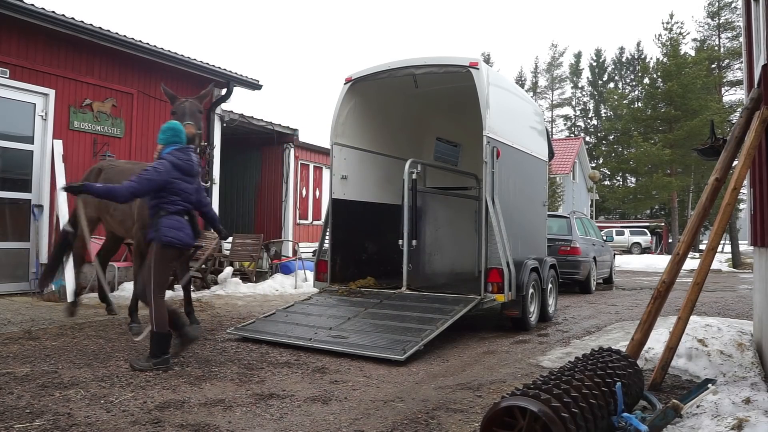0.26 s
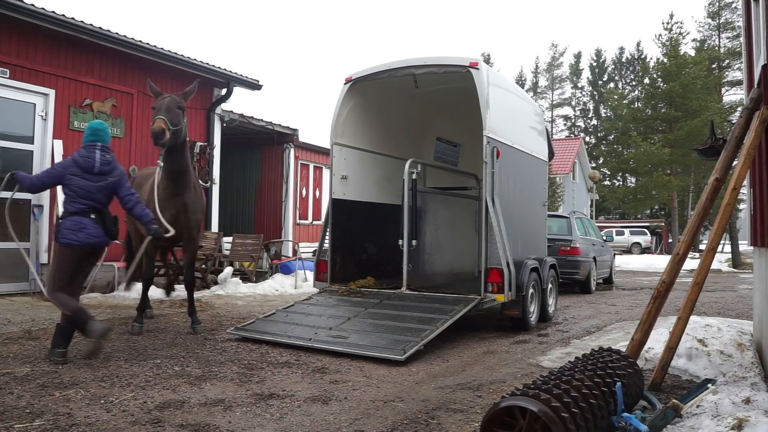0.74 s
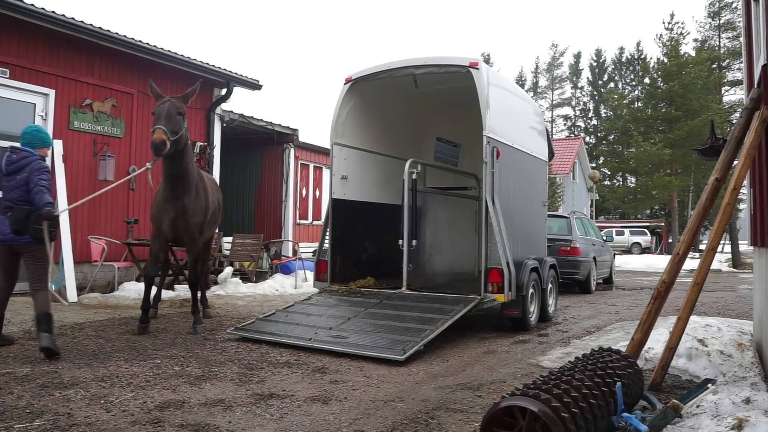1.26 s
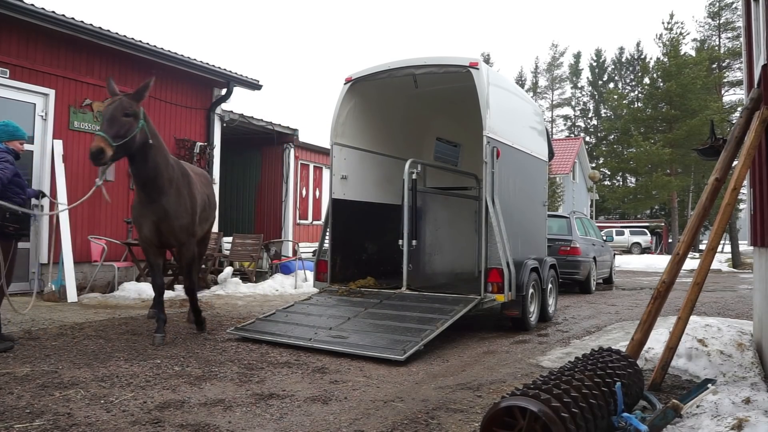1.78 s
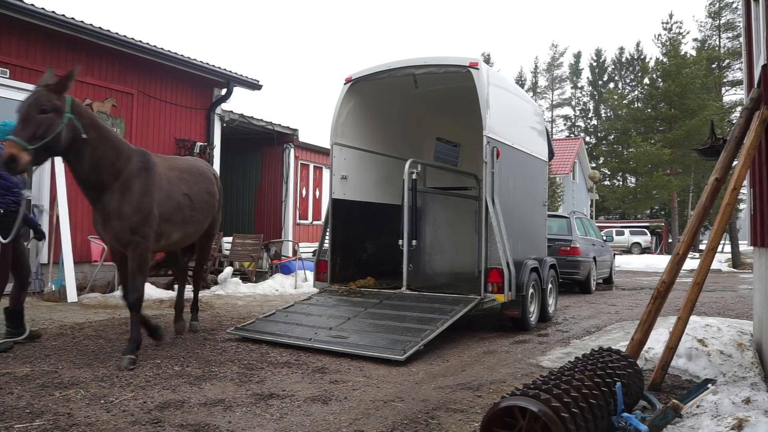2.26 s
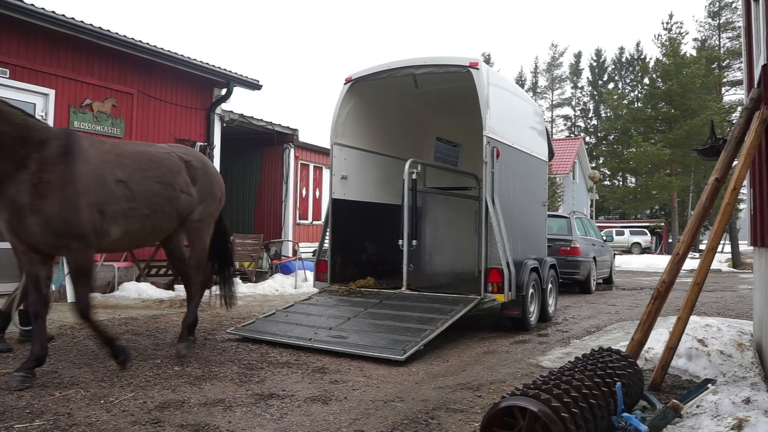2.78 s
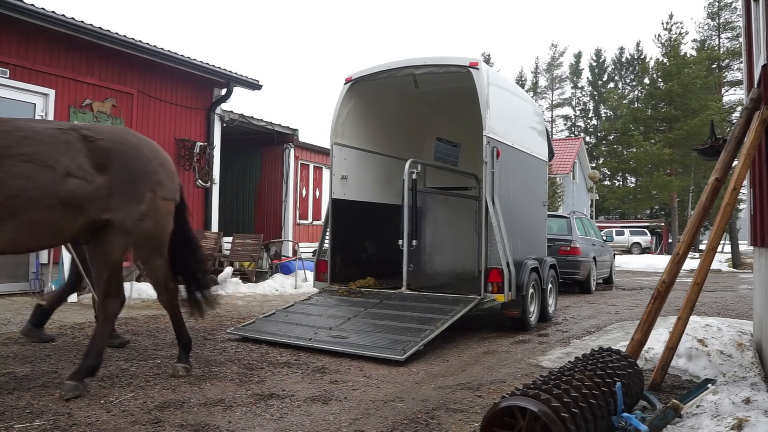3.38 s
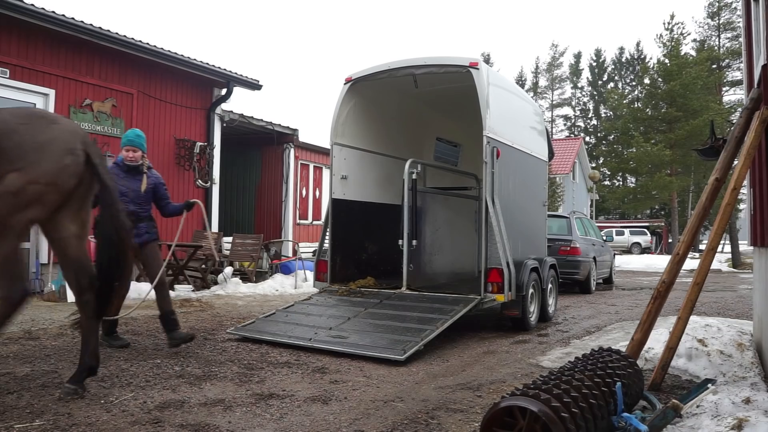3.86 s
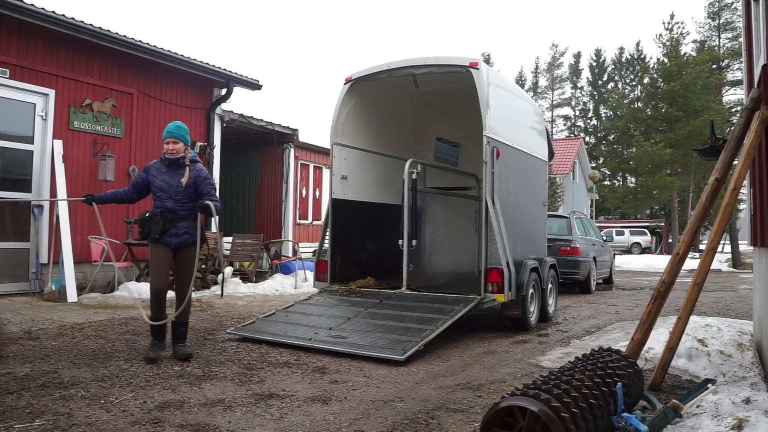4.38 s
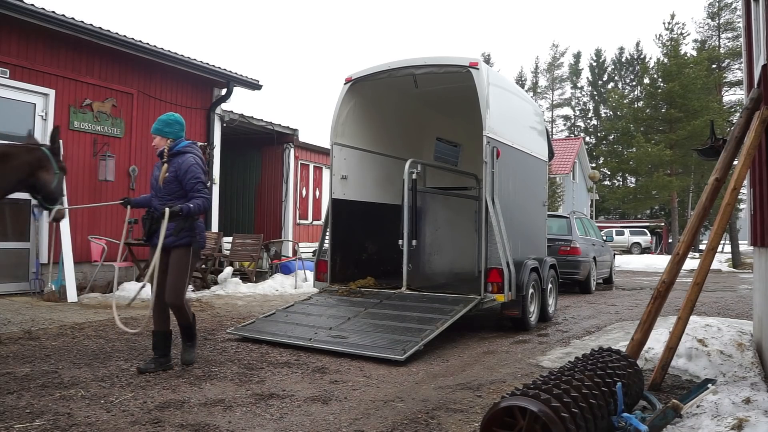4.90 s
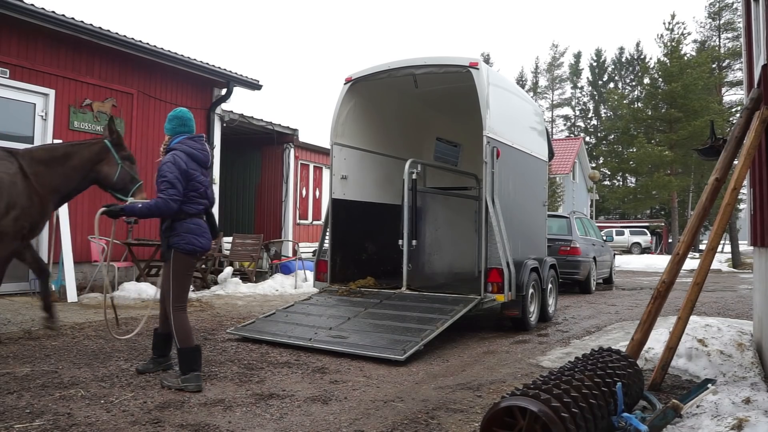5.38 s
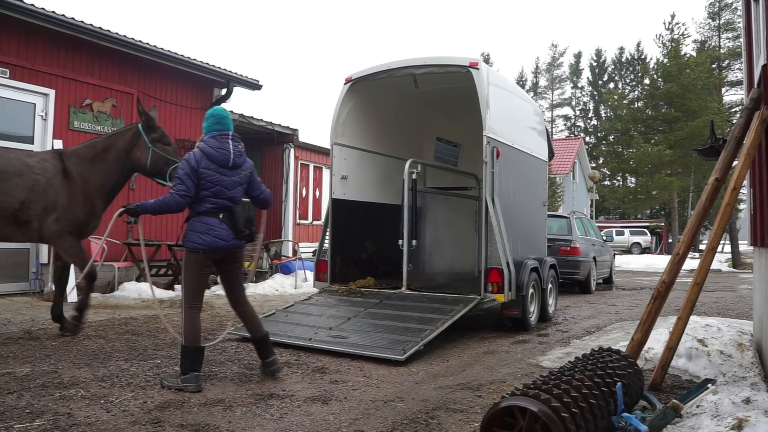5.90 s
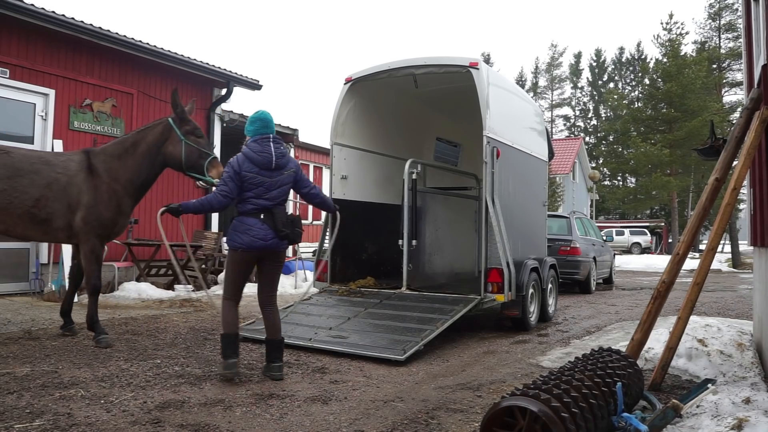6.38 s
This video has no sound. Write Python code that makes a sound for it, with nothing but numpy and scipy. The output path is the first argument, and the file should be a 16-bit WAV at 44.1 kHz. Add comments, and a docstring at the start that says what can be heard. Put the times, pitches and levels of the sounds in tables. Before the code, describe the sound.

Irregular hoof and boot steps crunch on damp, muddy gravel outdoors. A dense opening of knocks, scrapes and dull thumps includes a sharp stone crunch and thin pebble squeaks. Breeze rumbles at the microphone for the first second or so, then fades. Sparser, quieter steps follow over a faint yard hush, heard from a few metres, leaning left, with brief outdoor reflections.

```python
"""A yard of wet gravel: a mule is led round it, a few metres away and louder on the left; boots step along.
Each step crushes stones into a burst of tiny clicks, coloured band by band; scuffs swell and fade the same way.
Hooves knock in short hollow modes, thump the ground and now and then make a pebble squeal in a narrow band.
Barn walls answer briefly as decaying noise, and a light breeze buffets the microphone at first."""
import sys
import numpy as np
from scipy import signal
from scipy.io import wavfile

SR = 44100
rng = np.random.default_rng(int(sys.argv[2]) if len(sys.argv) > 2 else 0)


def wav_out(sig):
    """Save sig, one row per channel (or a flat mono array), as 16-bit PCM at SR to the path in sys.argv[1]."""
    wavfile.write(sys.argv[1], SR, np.round(np.clip(np.atleast_2d(sig).T, -1, 1) * 32767).astype(np.int16))


N = 293265
TIME = np.arange(N) / SR


def from_db(db):
    """Decibels become an amplitude factor."""
    return 10 ** (np.asarray(db) / 20)


def rms_one(x):
    """Scales a signal to an rms of 1."""
    return x / np.sqrt(np.mean(x ** 2) + 1e-20)


def at_hz(points, hz):
    """Reads a curve at a frequency, with straight lines over log frequency."""
    points_hz, values = np.array(points).T
    return np.interp(np.log(hz), np.log(points_hz), values)


def band(x, low_hz, high_hz):
    """Keeps one frequency band."""
    edges = [low_hz, min(high_hz, SR / 2 - 1)]
    return signal.sosfilt(signal.butter(2, edges, "band", fs=SR, output="sos"), x + 1e-18)


def flicker(rate):
    """A random wander of rms 1 that heads for a new value so many times a second."""
    knots = rng.standard_normal(4096)
    return rms_one(np.interp(TIME * rate, np.arange(len(knots)), knots))


def swell(s, rise, fall, roundness=0.98):
    """An envelope builds up to a peak of 1 and dies away; roundness 1 is pointed, 2 is a bell."""
    since = TIME - s
    near = (since > -8 * rise) & (since < 8 * fall)
    out = np.zeros(N)
    out[near] = np.exp(-np.maximum(-since[near] / rise, since[near] / fall) ** roundness)
    return out


def add(out, s, sound):
    """Mixes a short sound in at the given time."""
    start = max(round(s * SR), 0)
    out[start:start + len(sound)] += sound[:N - start]


def ring(hz, t60):
    """A struck mode: a dying sine, a quarter of a second long."""
    t = TIME[:SR // 4]
    return np.sin(2 * np.pi * hz * t) * from_db(-60 * t / t60)


def clicks(per_s, spread_db):
    """Three unrelated trains of contacts: a few much louder than most, or quieter if the spread is negative."""
    born = rng.random((3, N)) < per_s / SR
    count = born.sum()
    sizes_db = spread_db * np.minimum(rng.exponential(1, count), 4)
    out = np.zeros((3, N))
    out[born] = from_db(sizes_db) * rng.choice([-1, 1], count)
    return out


# How the source leans across the microphone pair. Each row: frequency in Hz, left minus right level in dB.
BALANCE = [(60, 2.7), (200, 4.1), (400, 5.3), (1300, 5.3), (2400, 4.3), (4400, 1.6), (5600, 0.84),
           (7000, 13.7), (8200, 2.9), (9500, 0.5), (15000, 1.5)]
LEFT_LAG_S = .00027  # the left channel comes this much later


def place(left, right, hz):
    """The source is louder in the left channel, and the two channels are a fraction of a millisecond apart."""
    half_db = at_hz(BALANCE, hz) / 2
    gains = from_db(half_db * np.array([[1], [-1]]))
    return rms_one(gains) * np.array([np.roll(left, round(LEFT_LAG_S * SR)), right])


# How alike the two microphones hear it. Each row: frequency in Hz, common share of power (clipped to 0..1 in use).
LIKENESS = [(60, 1.26), (300, 0.7), (900, 0.77), (2000, 0.21), (5000, -0.38), (8000, -0.34), (15000, -3)]


def coloured(drives, spectrum, patchy_db, patchy_rate, count):
    """Bands flare independently; part is common to both microphones, part differs. Stereo, rms 1."""
    out = 0
    edges = np.geomspace(spectrum[0][0], spectrum[-1][0], count + 1)
    for k, (low, high) in enumerate(zip(edges, edges[1:])):
        hz = np.sqrt(low * high)
        alike = np.clip(at_hz(LIKENESS, hz), 0, 1)
        drive = drives[k % 2]  # neighbouring bands use different trains
        pair = band(np.sqrt(alike) * drive[0] + np.sqrt(1 - alike) * drive[1:], low, high)
        level_db = at_hz(spectrum, hz) + patchy_db * flicker(patchy_rate)
        out = out + place(*pair, hz) * from_db(level_db)
    return rms_one(out)


def grains(spectrum, per_s, spread_db, patchy_db, count):
    """A steady stream of contacts with the given colour."""
    drives = [clicks(per_s, spread_db), clicks(per_s, spread_db)]
    return coloured(drives, spectrum, patchy_db, 60, count)


# Rumble of the breeze at the microphone. Each row: time in seconds, right-hand level in dB.
BREEZE = [(0, -43), (.18, -46), (.3, -37.5), (1.0, -38), (1.25, -44), (1.45, -63), (1.7, -51), (2.2, -58.5),
          (6.65, -63.5)]
# Colour of the rumble. Each row: frequency in Hz, relative level in dB per Hz.
WIND = [(40, -16), (50, 2), (62, 5.5), (80, 6.5), (120, -2.5), (170, -15.5), (300, -31.5)]
# Puffs on the right microphone port. Each row: start in seconds, level in dB ahead of the band filter.
PUFFS = [(0.349, -17), (0.745, -17.5), (1.191, -22), (1.215, -21), (1.286, -18), (2.741, -23.5)]


def wind():
    """Each port has its own noise rumble; single eddies hit the right one as short low rings."""
    ports = [coloured(rng.standard_normal((2, 3, N)), WIND, 2.7, 12, count=6)[0] for port in range(2)]
    left_right_db = np.array([[-3], [0]])
    rumble = rms_one(np.array(ports)) * from_db(np.interp(TIME, *np.transpose(BREEZE)) + left_right_db)
    puffs = np.zeros(N)
    for (s, level_db), detune in zip(PUFFS, rng.standard_normal(len(PUFFS))):
        add(puffs, s, from_db(level_db) * ring(78 * np.exp(0.071 * detune), 0.083))
    return rumble + band(puffs, 60, 190) * [[0], [1]]


# Colour of the quiet yard. Each row: frequency in Hz, relative level in dB per Hz.
YARD = [(38, -31), (50, 4.5), (70, 1), (120, 2), (200, -6), (340, -4), (580, -6.5), (800, -4.5),
        (1800, -18.5), (5200, -36), (6600, -24.5), (7700, -26.5), (9500, -38), (15500, -34.5)]
YARD_DB = -48.5


def yard_hush():
    """The steady background of the yard is noise whose bands waver slightly."""
    noise = rng.standard_normal((2, 3, N))
    return from_db(YARD_DB) * coloured(noise, YARD, 2.6, 16, count=22)


ATTACK_S, HOLD_SHARE = 0.0021, 0.3  # load time constant; hold as a share of the settling time
BRUSH_DB, BRUSH_S = -10, 0.0056  # the toe's brush: level re the footfall, time constant


def tread(s, settling):
    """The toe brushes the ground; then the load comes on towards 1, holds and dies away."""
    since = np.clip(TIME - s, 0, 1)
    onset = 1 - np.exp(-since / ATTACK_S)
    load = onset * np.exp(-np.maximum(since / settling - HOLD_SHARE, 0))
    return np.maximum(load, from_db(BRUSH_DB) * swell(s, BRUSH_S, BRUSH_S))


# A sole rolls off or drags through the gravel; levels are those ahead of the gravel mix.
# Each row: peak in seconds, fading time in seconds, stones in dB, fine grit in dB re stones.
SCUFFS = [(.005, 0.058, -36.5, 0), (0.219, 0.039, -37, -7.5), (0.494, 0.031, -28.5, -3.5),
          (0.789, 0.12, -36.5, -3.5), (0.933, 0.013, -35.5, -1.5), (.995, 0.043, -35, -10.5),
          (1.062, 0.01, -27, 3), (1.145, 0.034, -37, -1), (1.512, 0.021, -34.5, -19),
          (1.61, 0.017, -31.5, -13), (1.67, 0.021, -36.5, -7), (1.822, 0.019, -36.5, -1.5),
          (1.898, 0.017, -34.5, -3), (2.113, 0.036, -44, -2.5), (2.154, 0.011, -30, -7.5),
          (2.318, 0.036, -25.5, -10), (2.381, 0.0096, -25, 1), (2.559, 0.021, -48.5, 11.5),
          (2.649, 0.037, -42.5, 8), (2.722, 0.026, -45, 4), (3.2, 0.041, -46.5, -13),
          (3.322, 0.071, -41.5, -5.5), (3.89, 0.038, -43, 1), (4.0, 0.098, -49, -4.5),
          (4.61, 0.073, -55, -11), (4.793, 0.011, -40.5, -0.5), (5.118, 0.027, -39.5, -18),
          (5.181, 0.035, -44.5, -7.5), (5.395, 0.021, -40.5, 5), (5.578, 0.039, -49.5, -3.5),
          (5.706, 0.023, -46.5, 0.5), (6.266, 0.025, -49, -2.5), (6.385, 0.021, -52.5, 7),
          (6.447, 0.025, -39, -0.5), (6.588, 0.017, -56.5, 16.5)]
SCUFF_RISE_SHARE, SCUFF_ROUNDNESS = 0.81, 1.27  # swelling time re fading time; shape
# the sole's hollow rub in a typical scuff; its stones; share of the stones' dB swing that the sole follows
SCUFF_SOLE_DB, SCUFF_TYPICAL_DB, SOLE_FOLLOWS = -35.5, -33.5, 0.5
# A hoof or boot is set down on the stones; levels are those ahead of the gravel mix. Each row: start in
# seconds, settling time in seconds, stones in dB, fine grit in dB re stones, hollow sole in dB re stones.
FOOTFALLS = [(0.057, 0.019, -28, -7.5, 2.5), (0.091, 0.013, -34, -5, 3.5), (0.287, 0.02, -36, -14, 8.5),
             (0.372, 0.023, -36.5, -11, 8.5), (0.47, 0.054, -33, -16, -2), (0.511, 0.013, -25, -5, 2.5),
             (.559, 0.028, -24, -7.5, -9), (0.623, 0.0063, -39.5, 1, 15), (0.863, 0.051, -31.5, -1, 2.5),
             (1.027, 0.047, -31.5, -1.5, 2.5), (1.112, 0.0057, -41.5, 12, -1),
             (1.395, 0.0089, -44, -8, 10.5), (1.476, 0.061, -38.5, 3.5, -19), (1.55, 0.018, -28, 1.5, 4.5),
             (1.636, 0.0067, -16.5, -9.5, -8), (1.774, 0.015, -27, -0.5, -2),
             (2.002, 0.022, -45.5, -17, 12), (2.052, 0.015, -38, 6, 9), (2.279, 0.015, -32, 6.5, -9),
             (2.802, 0.028, -37, 3.5, 5.5), (2.84, 0.023, -27, -13, -3.5), (3.072, 0.028, -42.5, -4.5, 4),
             (3.619, 0.041, -35.5, -1, -3), (3.897, 0.035, -43, -1, 4.5), (4.243, 0.022, -42.5, 5, 10),
             (4.293, 0.039, -33, -9.5, -6), (4.349, .04, -49.5, -15, 13.5), (4.425, 0.031, -29.5, -3, -3.5),
             (4.775, 0.021, -39, 2, 2), (4.931, 0.021, -45.5, -3.5, 0.5), (5.002, 0.0088, -47.5, -0.5, -6),
             (5.078, 0.038, -43, 4, 5), (5.38, 0.016, -40.5, 1, 11), (6.003, 0.018, -40.5, 6.5, 4),
             (6.104, 0.027, -41, 0.5, 0), (6.316, 0.017, -40.5, -30, 7.5)]


def pressing():
    """Footfalls work stones, grit and sole at once, scuffs gradually; the bed gives way in small jerks."""
    power = np.zeros((3, N))
    for s, settling, stones_db, grit_db, sole_db in FOOTFALLS:
        levels = from_db([stones_db, stones_db + grit_db, stones_db + sole_db])
        power += np.outer(levels, tread(s, settling)) ** 2
    for s, fading, stones_db, grit_db in SCUFFS:
        sole_db = SCUFF_SOLE_DB + SOLE_FOLLOWS * (stones_db - SCUFF_TYPICAL_DB)
        levels = from_db([stones_db, stones_db + grit_db, sole_db])
        drag = swell(s, SCUFF_RISE_SHARE * fading, fading, SCUFF_ROUNDNESS)
        power += np.outer(levels, drag) ** 2
    jerks = from_db(1.43 * flicker(260))
    return np.sqrt(power) * jerks


def pebbles(force, per_s=12, t60=0.15, count=36):
    """Single stones snap against each other and ring briefly, each at a pitch of its own."""
    out = np.zeros((2, N))
    for hz in np.geomspace(2000, 9000, count) * np.exp(0.0244 * rng.standard_normal(count)):
        hits = clicks(per_s, 3.7)[0] * force
        mode = ring(hz, t60)[:SR // 20]
        mode[1] += 3  # the dry tick of first contact
        mode = mode * np.sqrt(SR / (per_s * count * np.sum(mode ** 2)))
        sound = signal.oaconvolve(hits, mode)[:N]
        out += place(sound, sound * rng.choice([-1, 1]), hz)
    return out


# Colours of coarse stones, of ordinary stones, of fine grit and of the hollow sole.
# Each row: frequency in Hz, relative level in dB per Hz.
COARSE = [(900, 6), (1400, -4.5), (1900, -3), (2700, 2), (3400, -3), (4600, -8.5)]
STONES = [(1800, -32), (2800, -4), (3700, -0.5), (4500, -1), (5300, 0.5), (6300, -8), (8000, -22)]
GRIT = [(4500, -7), (6000, -5.5), (6800, -3), (7700, 6), (8700, -5), (9600, -11.5), (12000, -19),
        (15500, -16)]
HOLLOW = [(150, -16.5), (340, -3), (480, 0), (610, -12.5), (760, 5.5), (950, -3), (1170, 2), (1450, -6),
          (2000, -13.5)]


def gravel(stones, grit, hollow, sorting=0.33):
    """Each press sets stones and grit crackling; where there is little grit the coarse, lower stones gain."""
    fineness = np.clip((grit + 1e-6) / (stones + 1e-6), .1, 3) ** sorting
    coarse_stones = stones / fineness * grains(COARSE, per_s=1500, spread_db=4.0, patchy_db=3.0, count=10)
    plain_stones = stones * fineness * grains(STONES, per_s=1700, spread_db=1.5, patchy_db=5.0, count=12)
    fine_grit = grit * grains(GRIT, per_s=1800, spread_db=3.5, patchy_db=3.0, count=20)
    sole = hollow * grains(HOLLOW, per_s=1100, spread_db=3.0, patchy_db=3, count=14)
    return (from_db(-5.5) * coarse_stones + from_db(-1.5) * plain_stones + from_db(1.33) * fine_grit
            + from_db(-2.5) * sole + from_db(-14) * pebbles(stones))


SETTLING_DB = -64.5


def settling_stones():
    """Loose stones tick sparsely throughout, at a level that wanders slightly."""
    level = from_db(SETTLING_DB + 0.84 * flicker(7.6))
    return level * grains(STONES, per_s=220, spread_db=3.5, patchy_db=9.5, count=8)


ECHO_DB, YARD_T60_S = -11, 0.17


def walls(x):
    """Scattered echoes from barn and trailer, different for each side, with little bass or top."""
    t = TIME[:SR // 2]
    tail = rng.standard_normal((2, len(t))) * from_db(-60 * t / YARD_T60_S)
    tail = band(tail * np.clip(t / 0.01, 0, 1), 150, 8000)
    tail *= np.sqrt(1 / np.sum(tail ** 2))
    return signal.fftconvolve(x, tail, axes=1)[:, :N]


# Thin, high fizzes of wet grit under a sole; the one at 4.161 s is a lone stone tick.
# Each row: start in seconds, level in dB.
FIZZES = [(.513, -37), (1.03, -41), (1.052, -34), (2.282, -34.5), (3.62, -40), (4.161, -55), (4.432, -44),
          (5.38, -50), (6.002, -49), (6.108, -41)]
# Colours of the fizz and of a cracking stone. Each row: frequency in Hz, relative level in dB per Hz.
FIZZ = [(11000, -8), (12500, 13), (14000, 3.5), (16000, 0)]
CRACK = [(350, -13), (900, 23), (1800, 18), (3500, 8), (5500, -6.5), (9500, -11)]
CRACK_DB = -6.5  # the first stone under the sole: level re the footfall's stones


def cracks_and_fizzes():
    """A cracking stone gives a burst of a few milliseconds; dense high grains give a thin, short fizz."""
    crack = sum(from_db(stones_db + CRACK_DB) * swell(s + 0.0027, 0.00015, 0.001)
                for s, _, stones_db, *_ in FOOTFALLS)
    fizz = sum(from_db(level_db) * swell(s + 0.00176, 0.0014, .018) for s, level_db in FIZZES)
    return (crack * grains(CRACK, per_s=9500, spread_db=-2.5, patchy_db=-3, count=8)
            + fizz * grains(FIZZ, per_s=6000, spread_db=7.0, patchy_db=5.0, count=3))


# Full weight lands on soft ground. Each row: start in seconds, thump in dB ahead of its band filter,
# thump pitch in Hz before a small random detuning, mud slap in dB.
LANDINGS = [(0.091, -25, 86, -32.5), (.289, -26, 135, -27.5), (0.374, -27, 112, -29.5),
            (.468, -28, 90, -29), (.516, -22, 85, -33), (.865, -23.5, 119, -36), (1.053, -43, 105, -38),
            (1.149, -33, 97, -33), (1.558, -33, 101, -51), (1.637, -27.5, 91, -26.5),
            (2.057, -26, 93, -27.5), (2.809, -21.5, 112, -49), (3.075, -41, 111, -36.5),
            (3.904, -30, 137, -37.5), (4.245, -36, 120, -43), (4.357, -36, 101, -39),
            (4.427, -32.5, 99, -40), (5.096, -32.5, 92.5, -50), (5.384, -43, 110, -40.5),
            (6.441, -41, 115, -39)]
# Colour of the wet earth. Each row: frequency in Hz, relative level in dB per Hz.
MUD = [(110, -3), (210, -0.5), (320, 0.5), (480, 0.5), (700, -9), (1200, -20.5)]
THUMP_T60_S, SLAP_S = 0.093, 0.012


def landings():
    """The ground gives a low dying thump and wet earth slaps under each heavy step."""
    thump, slap = np.zeros(N), np.zeros(N)
    for (s, thump_db, hz, slap_db), detune in zip(LANDINGS, rng.standard_normal(len(LANDINGS))):
        add(thump, s, from_db(thump_db) * ring(hz * np.exp(0.052 * detune), THUMP_T60_S))
        slap += from_db(slap_db) * swell(s + 0.0028, 0.0016, SLAP_S)
    thump = band(thump, 71, 170)
    return place(thump, thump, 100) + slap * grains(MUD, per_s=2000, spread_db=3.5, patchy_db=1.5, count=9)


# Hoof wall striking a stone. Each row: moment of the stop in seconds, level in dB, pitch in Hz.
KNOCKS = [(.181, -28, 970), (0.211, -18, 1040), (.292, -21, 864), (.333, -34, 1004), (.377, -22, 1420),
          (.46, -20.5, 855), (.472, -17.5, 854), (.489, -21, 870), (.563, -18.5, 1020), (.575, -14, 812),
          (.595, -23, 1000), (.627, -23.5, 778), (0.866, -24, 1124), (.945, -23.5, 1334), (1.561, -17, 817),
          (1.587, -24.5, 1150), (1.611, -20, 804), (1.82, -24, 1166), (2.003, -30.5, 1150),
          (2.061, -33, 1090), (2.253, -21, 1110), (2.331, -23, 1082), (2.848, -25, 793), (4.302, -26, 1003),
          (4.35, -31, 964), (5.111, -26, 1080), (5.383, -41, 1050), (6.316, -32, 1096)]
# What a hoof rings with, before small random changes of level and pitch.
# Each row: multiple of the knock's pitch, level in dB re the knock, 60 dB decay time in seconds.
HOOF_MODES = [(.45, -24, 0.022), (.8, -34.5, 0.052), (1.001, 2, 0.027), (1.24, -3.5, 0.013),
              (1.65, -15.5, 0.026), (2.9, -30, 0.0063), (4.3, -24, 0.011)]
# a harder knock slips for longer before it stops: typical slip, typical knock, share of its dB followed
KNOCK_BUILD_UP_S, KNOCK_TYPICAL_DB, BUILD_UP_FOLLOWS = .0013, -22, 0.57
# the hoof wall grinds on the stone around each knock: level re the knock, time constants
GRIND_DB, GRIND_RISE_S, GRIND_FALL_S = -17.5, .004, 0.031


def knocks(hollow):
    """The hoof rings in a few short modes: slipping pumps them up, the stop lets them die, stones rub them."""
    out = np.zeros(N)
    grinding = sum(from_db(level_db + GRIND_DB) * swell(s, GRIND_RISE_S, GRIND_FALL_S)
                   for s, level_db, _ in KNOCKS)
    rubbing = np.hypot(from_db(-8) * hollow, grinding) * rms_one(clicks(1500, 3.8)[0])
    nearest = abs(TIME - np.array(KNOCKS)[:, :1]).argmin(axis=0)
    t = TIME[:SR // 5] - .03  # zero at the stop
    chances = rng.standard_normal((len(KNOCKS), 2, len(HOOF_MODES)))
    for k, ((s, level_db, hz), chance) in enumerate(zip(KNOCKS, chances)):
        hoof = 0
        build_up = KNOCK_BUILD_UP_S * from_db(BUILD_UP_FOLLOWS * (level_db - KNOCK_TYPICAL_DB))
        for (multiple, mode_db, t60), loud, detune in zip(HOOF_MODES, *chance):
            envelope = np.exp(np.minimum(t / build_up, -np.log(1000) * t / t60))
            level = from_db(mode_db + 1.9 * loud) * np.sign(loud)
            mode_hz = hz * multiple * (1 + 0.026 * detune)
            hoof = hoof + level * envelope * np.sin(2 * np.pi * mode_hz * t)
        add(out, s + t[0], from_db(level_db) * hoof)
        # rubbing excites the modes of the knock nearest in time
        answer = hoof[t > 0] / np.linalg.norm(hoof[t > 0])
        here = nearest == k
        add(out, TIME[here][0], signal.fftconvolve(rubbing[here], answer))
    return place(out, out, 1000)


# Pebbles skidding on each other. Each row: peak in seconds, level in dB, pitch in Hz.
SKIDS = [(1.035, -27, 8650), (1.058, -18.5, 8460), (1.056, -17, 5100), (1.059, -19, 4600),
         (2.287, -17.5, 7770), (2.65, -19.5, 7200), (4.441, -28.5, 5100), (4.788, -36, 4870),
         (6.393, -36, 7700), (6.591, -39, 6950)]
SKID_RISE_S, SKID_FALL_S, SKID_ROUNDNESS = 0.0076, 0.011, 1.3  # every skid swells and fades alike


def skids(width=0.1):
    """A pebble slips in a rapid chatter that rings in one narrow band; width is a share of its pitch."""
    out, chatter = np.zeros((2, N)), clicks(3500, 0.95)
    mixed = 0.15 * chatter[0] + chatter[1:]  # a little common to both channels
    for s, level_db, hz in SKIDS:
        squeal = rms_one(band(mixed, hz * (1 - width / 2), hz * (1 + width / 2)))
        envelope = swell(s, SKID_RISE_S, SKID_FALL_S, SKID_ROUNDNESS)
        out += from_db(level_db) * envelope * place(*squeal, hz)
    return out


def scene():
    """Footfalls, loose stones ticking, their echoes, the hush of the yard and the breeze."""
    stones, grit, hollow = pressing()
    feet = gravel(stones, grit, hollow) + settling_stones() + cracks_and_fizzes()
    feet = feet + landings() + knocks(hollow) + skids()
    return feet + from_db(ECHO_DB) * walls(feet) + yard_hush() + wind()


CUTOFF_HZ = 16000


def record(dry, dip_hz=10700, dip_width_hz=2600, low_cut_hz=44):
    """A band in the high treble is dull; deep bass and the top are cut."""
    dull = signal.lfilter(*signal.iirnotch(dip_hz, dip_hz / dip_width_hz, fs=SR), dry)
    mixed = 0.87 * dull + 0.14 * dry  # part of the dry sound keeps the dip from being total
    lean = signal.sosfilt(signal.butter(3, low_cut_hz, "high", fs=SR, output="sos"), mixed)
    return signal.sosfilt(signal.ellip(10, .3, 70, CUTOFF_HZ, fs=SR, output="sos"), lean)


dry = scene()
out = record(dry)
wav_out(out)
```